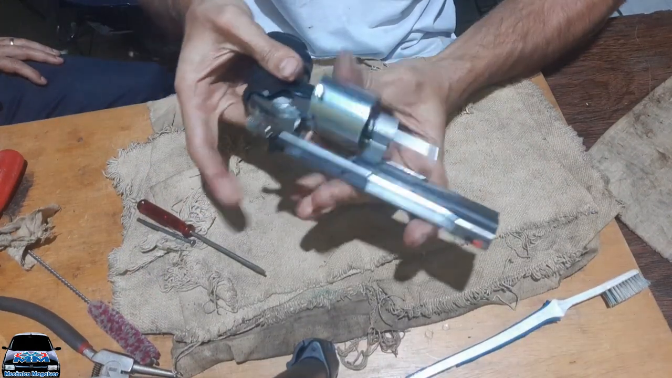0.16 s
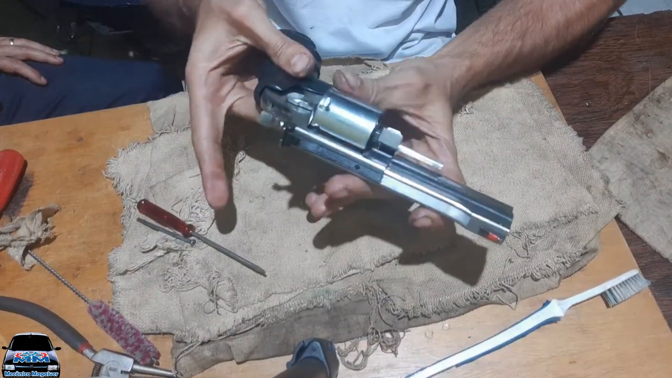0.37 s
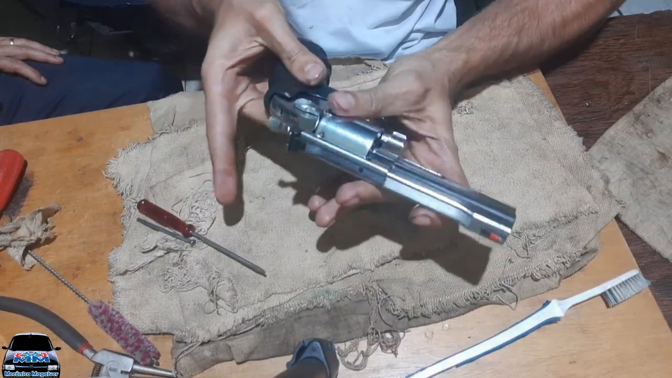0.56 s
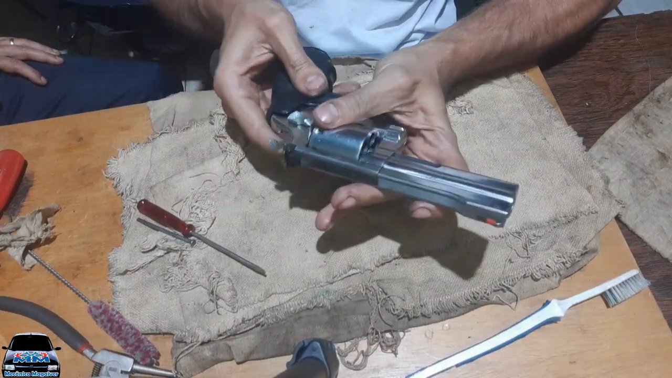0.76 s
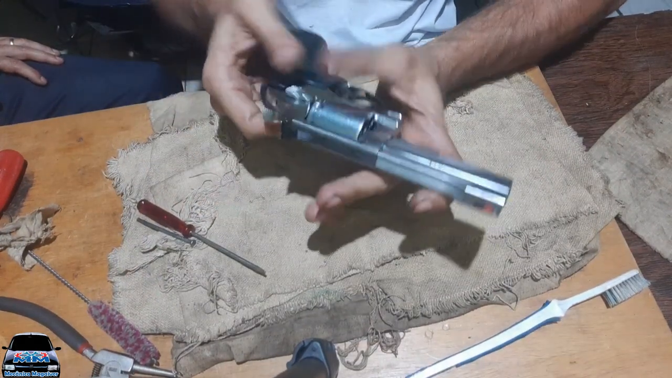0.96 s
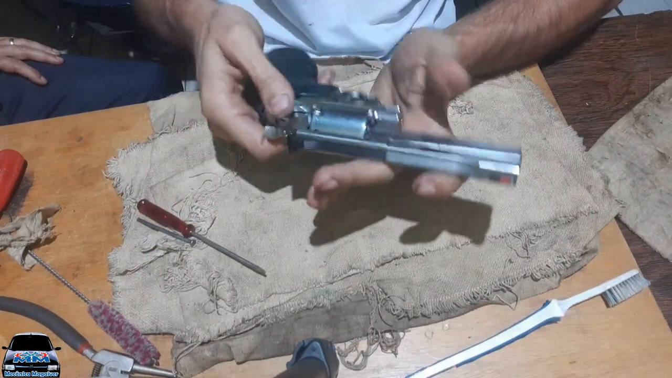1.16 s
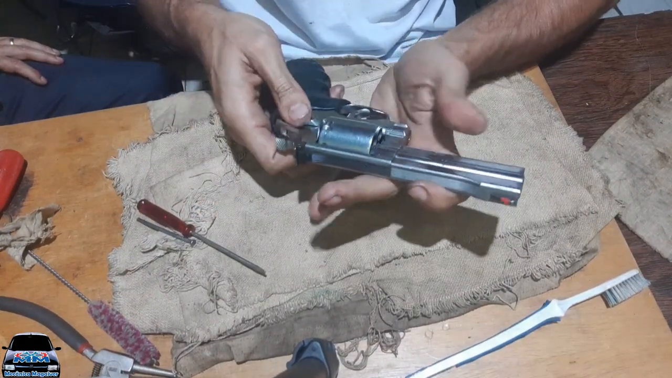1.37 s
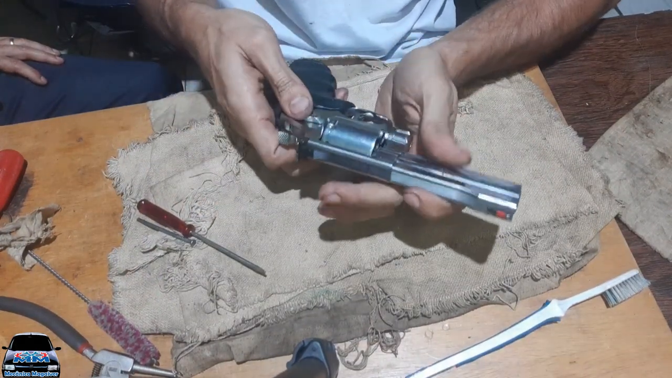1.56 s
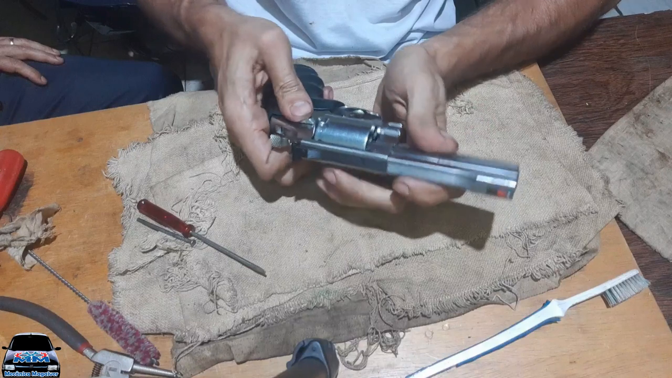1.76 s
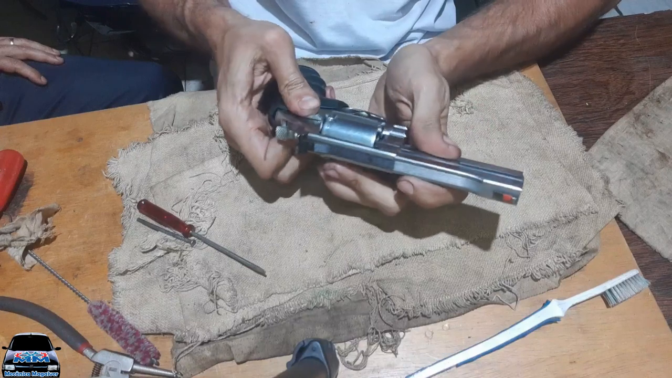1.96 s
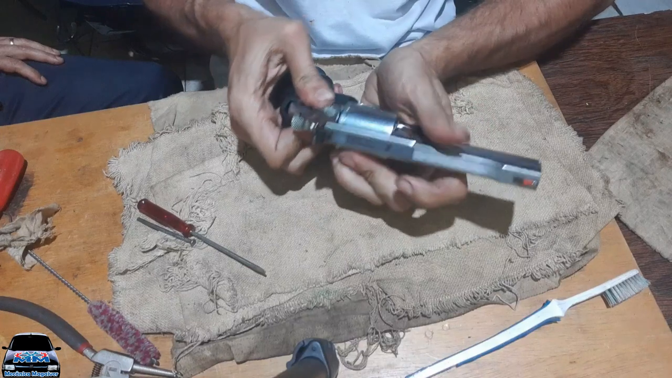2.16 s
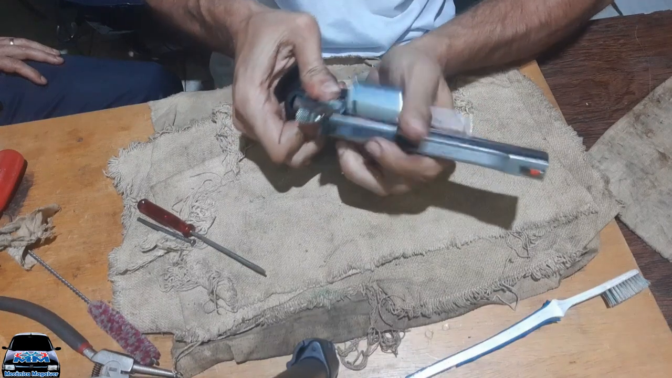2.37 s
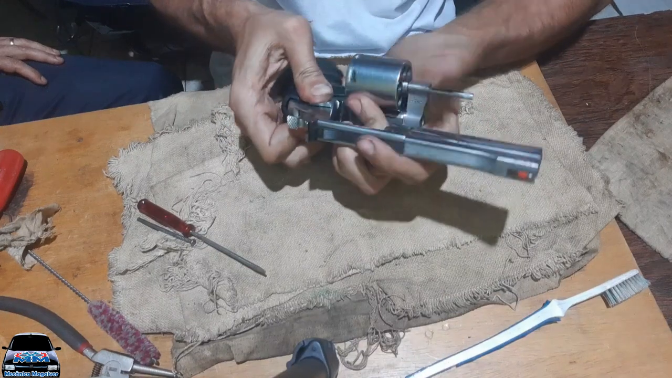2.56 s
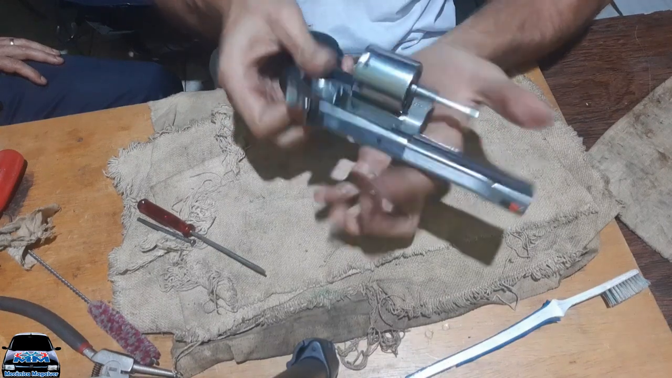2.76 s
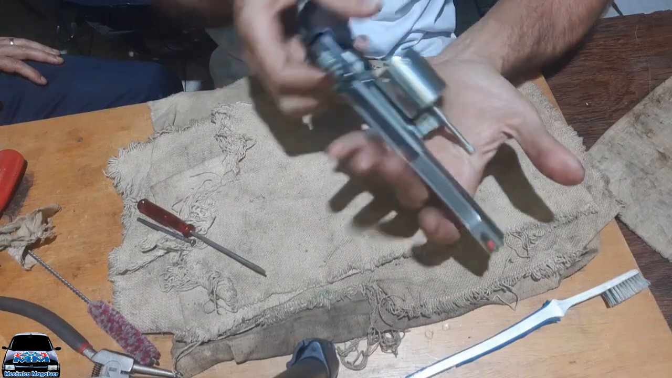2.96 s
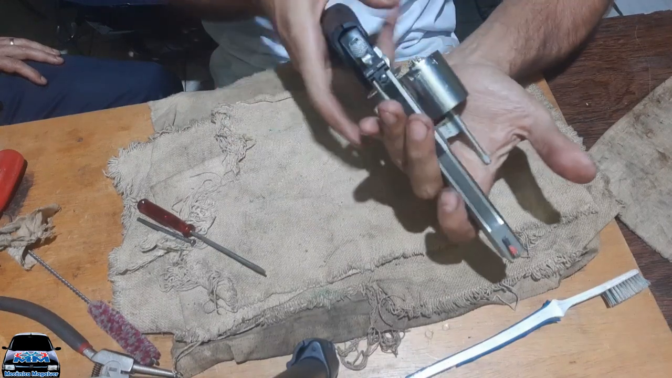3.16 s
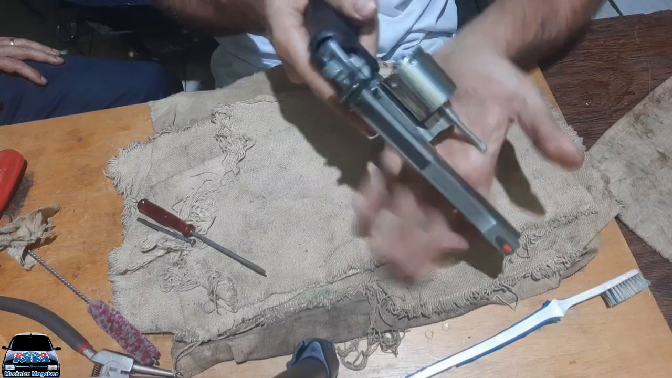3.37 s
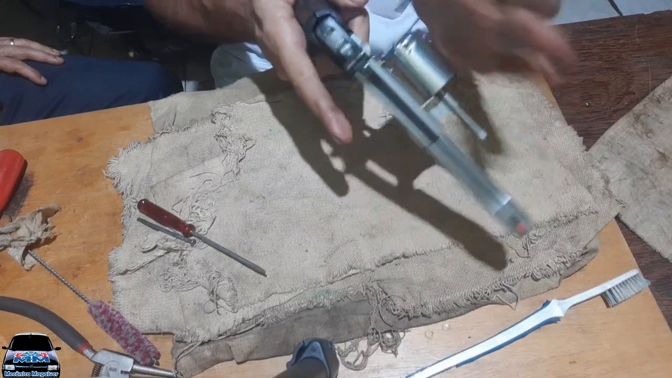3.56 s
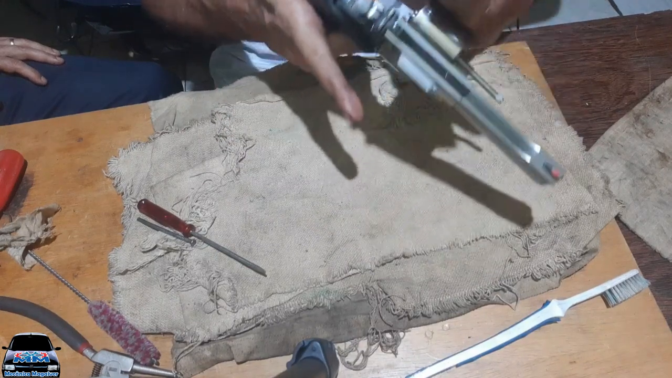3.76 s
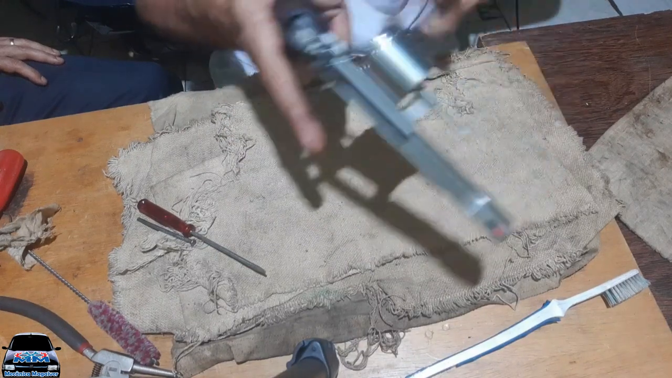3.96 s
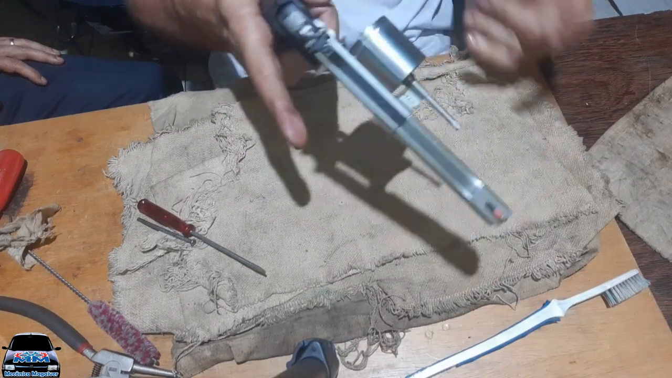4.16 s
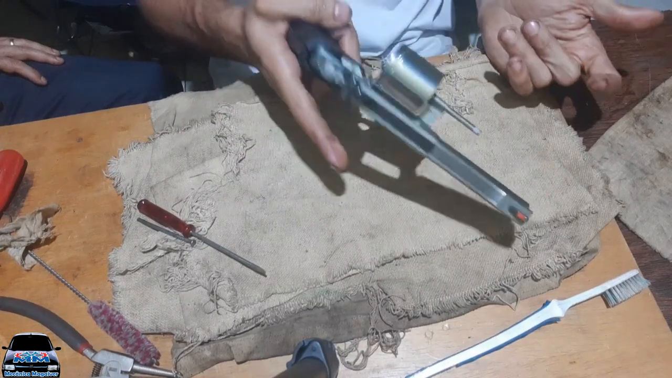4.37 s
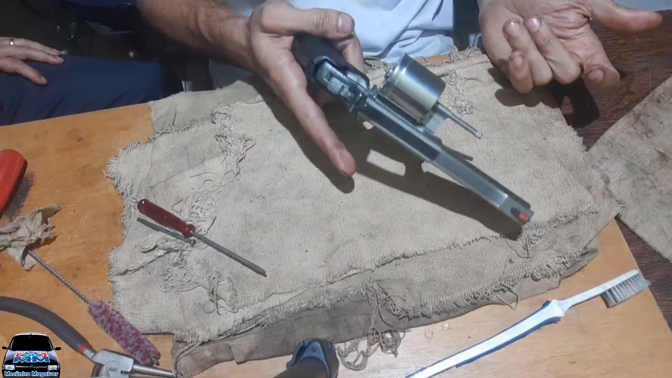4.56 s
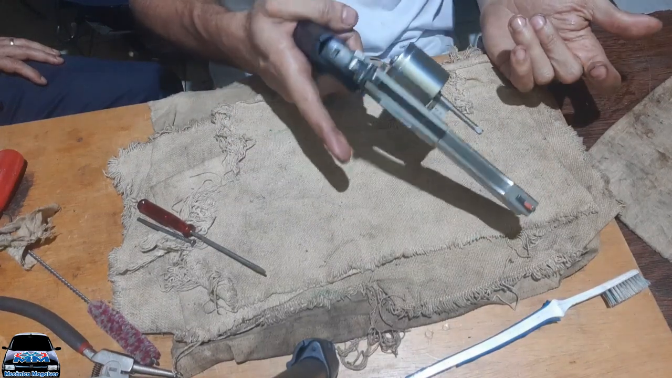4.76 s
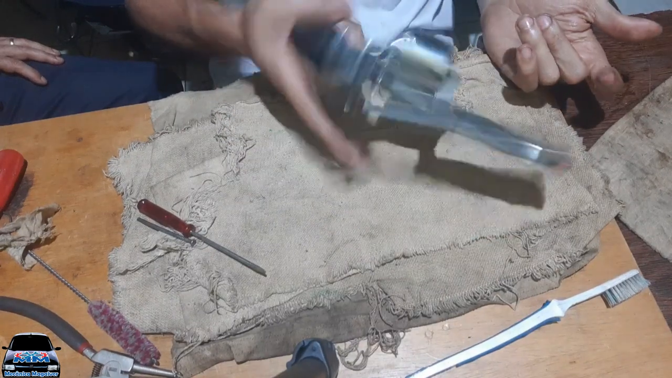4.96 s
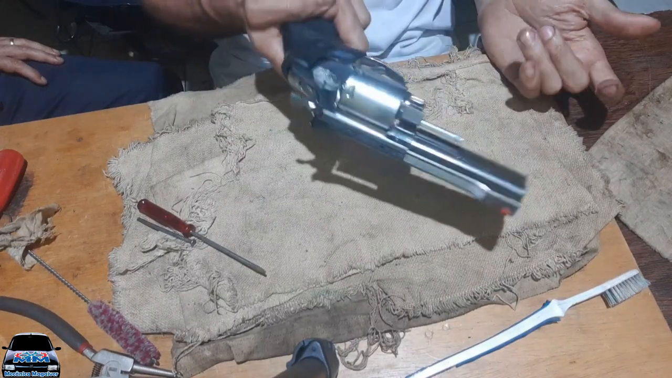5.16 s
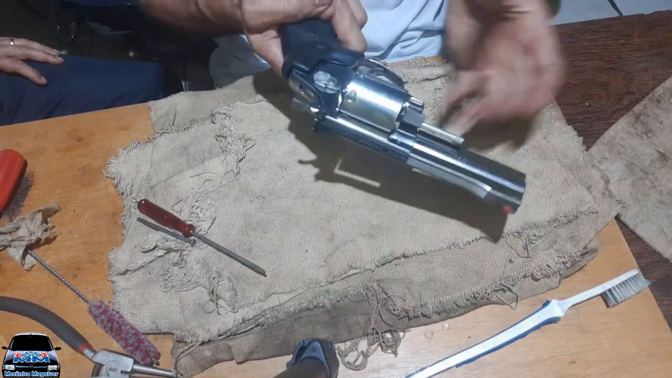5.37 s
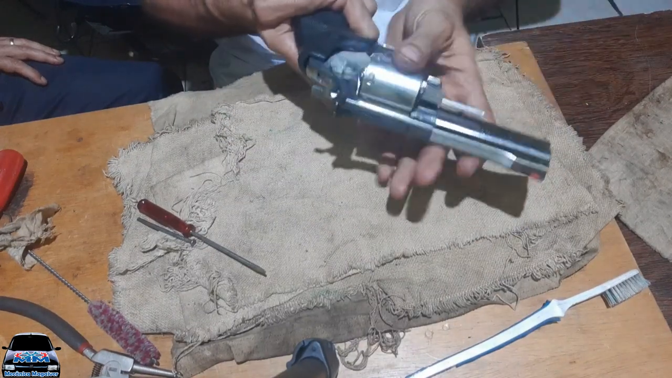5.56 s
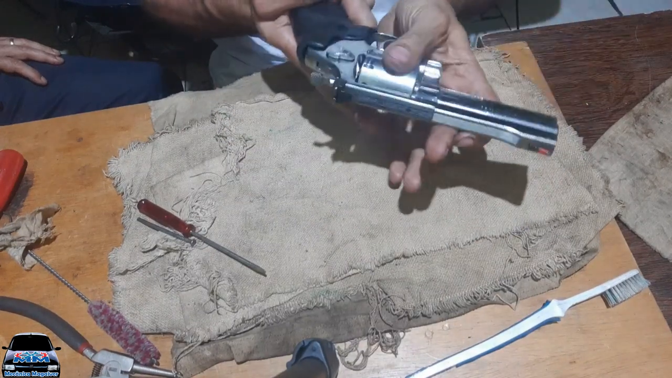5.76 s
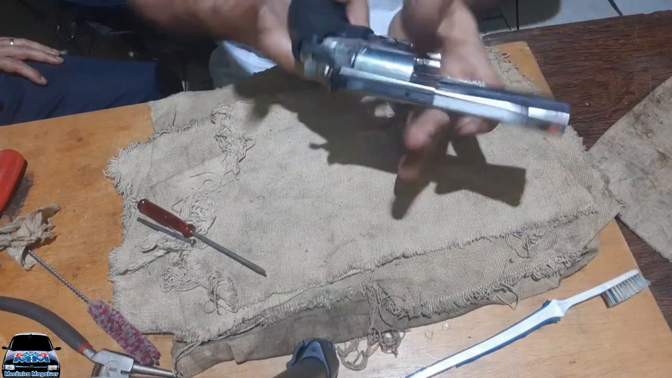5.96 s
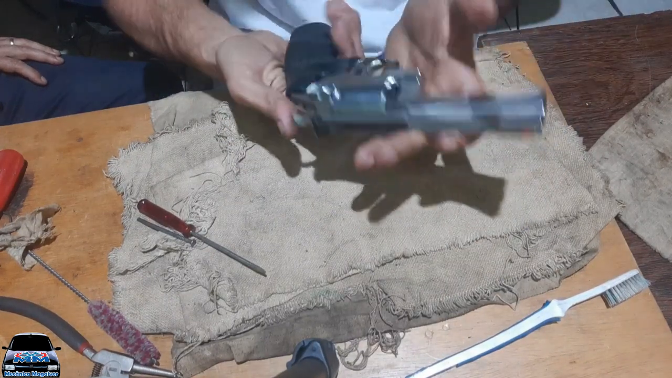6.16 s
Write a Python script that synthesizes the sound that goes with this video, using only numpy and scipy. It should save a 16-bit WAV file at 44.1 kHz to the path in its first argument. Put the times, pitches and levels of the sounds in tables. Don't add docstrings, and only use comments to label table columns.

```python
import sys
import numpy as np
from scipy import signal
from scipy.fft import rfft, irfft
from scipy.io import wavfile

SR = 44100
rng = np.random.default_rng(int(sys.argv[2]) if len(sys.argv) > 2 else 0)


def persist_wave(psi):
    counts = np.round(np.clip(psi, -1, 1) * 32767).astype(np.int16)
    wavfile.write(sys.argv[1], SR, np.atleast_2d(counts).T)


def ratio(d):
    e = np.asarray(d, float) / 20
    return 10 ** e


N = 274302


def at_hz(points, hz):
    points_hz, values = np.array(points).T
    return np.interp(np.log(hz), np.log(points_hz), values)


def rms_one(x):
    return x / np.sqrt(np.mean(x ** 2) + 1e-20)


def add(out, start_s, sound):
    i = round(start_s * SR)
    out[..., i:i + sound.shape[-1]] += sound[..., :N - i]


def ring(clicks, hz, t60_s):
    decay = ratio(-60 / (t60_s * SR))
    turn = 2 * np.pi * hz / SR
    return signal.lfilter([0, np.sin(turn)], [1, -2 * decay * np.cos(turn), decay ** 2], clicks + 1e-18)


def drift(rate_hz):
    decay = np.exp(-80 * np.pi * rate_hz / SR)
    coarse = rng.standard_normal(N // 40 + 2002)
    slow = signal.lfilter([1], [1, -2 * decay, decay ** 2], coarse)[2000:]
    return np.interp(np.arange(N) / 40, np.arange(len(slow)), rms_one(slow))


# (pitch_hz, likeness from -1 to 1)
PORT_LIKENESS = [(30, 0.79), (70, 1), (180, 0.71), (550, 0.43), (1650, -0.12), (4970, 0.07), (15000, -0.24)]


def bands(size):
    edges_hz = 22 * 2 ** np.arange(0, 9.6, .5)
    white = rng.standard_normal((2, 2, size))
    for k, (low, high) in enumerate(zip(edges_hz, edges_hz[1:])):
        band = signal.butter(2, [low, high], "band", fs=SR, output="sos")
        mid, side = signal.sosfilt(band, white[k % 2])
        hz = np.sqrt(low * high)
        alike = np.clip(at_hz(PORT_LIKENESS, hz), -1, 1)
        yield hz, np.sqrt(1 + alike) * mid + np.sqrt(1 - alike) * side * [[1], [-1]]


# (time_s, drone_db)
TRAFFIC_DRONE = [(0.0, -68), (0.29, -70), (0.78, -63), (1.39, -67), (1.8, -70), (1.97, -69.5),
                 (2.55, -69.5), (2.74, -65), (2.91, -62), (3.22, -70), (4.07, -71), (4.31, -65),
                 (4.57, -70), (4.81, -72), (5.78, -65), (6.22, -65)]
# (pitch_hz, level_db per Hz)
TRAFFIC_COLOUR = [(15, -46), (25, -8), (108, -4.5), (137, -14.5), (161, -15.5), (195, -17), (270, -23.5),
                  (309, -15.5), (427, -16.5), (516, -22.5), (659, -17.5), (1560, -25.5), (5140, -40.5),
                  (8830, -38), (16000, -56)]


def street(patchy_db=2.0):
    drone_db = np.interp(np.arange(N) / SR, *np.transpose(TRAFFIC_DRONE))
    swing_db = drone_db - drone_db.mean()
    rumble_db = -65.5 + 0.37 * swing_db
    hiss_db = -73.5 + 0.6 * swing_db
    layers = np.zeros((3, 2, N))
    for hz, noise in bands(N):
        layer = np.searchsorted([180, 1300], hz)
        layers[layer] += ratio(at_hz(TRAFFIC_COLOUR, hz) + patchy_db * drift(17)) * noise
    return sum(ratio(db) * rms_one(x) for db, x in zip((rumble_db, drone_db, hiss_db), layers))


# (start_s, end_s, pitch_hz, width_hz, level_db)
FAR_NOTES = [
    (0.214, 1.484, 101, 9.9, -65.5),
    (0.643, 1.003, 596, 5.5, -73),
    (1.293, 1.83, 1209, 65, -72.5),
    (1.594, 2.077, 465, 68, -70.5),
    (2.476, 3.104, 589, 87, -74),
    (5.5, 5.888, 476, 71, -71.5),
]


def far_notes():
    out, t = 0, np.arange(N) / SR
    for start_s, end_s, hz, width_hz, level_db in FAR_NOTES:
        t60_s = np.log(1000) / (1.55 * np.pi * width_hz)
        tone = ring(ring(rng.standard_normal(N), hz, t60_s), hz, t60_s)
        fade = np.clip(np.minimum(t - start_s, end_s - t) / .04, 0, 1)
        out = out + ratio(level_db) * rms_one(tone) * fade
    return out


# (start_s, part struck, level_db per Hz, chatter_ms, extra weight_db near 1.3 kHz, extra edge_db near 11 kHz)
SNAPS = [(.3755, "crane", 15, 3.1, 2.5, 0.8), (.6486, "catch", 8.5, 1.7, -11.8, -2),
         (.8662, "ratchet", -2, 3, -17, 6.5), (.8676, "ratchet", 0, 2.1, 2.5, -9),
         (2.5573, "latch", 0.5, 0.78, -6, -7.5), (2.7152, "stop", -0.5, 0.86, -12, 0),
         (4.0892, "latch", -4.5, 1.6, -6.5, 1.5), (5.1802, "latch", -1.5, 1.2, -4.5, 0.5),
         (5.2172, "lock", 10.5, 0.77, 1.5, 4), (5.2207, "lock", 7, 1.1, -35.5, 0),
         (5.8047, "drum", 4, 3.1, .2, 4.5), (5.8287, "drum", 7.5, 1.8, -3.8, -0.8)]
# (start_s, part struck,
# level_db per Hz)
LIGHT_TOUCHES = [(0.638, "lock", -19), (1.223, "lock", -39), (1.903, "ratchet", -28),
                 (2.509, "slide", -32.5), (2.52, "slide", -32), (2.5324, "slide", -29),
                 (2.5378, "slide", -18), (2.546, "slide", -17.5), (2.6878, "latch", -18),
                 (3.553, "lock", -33), (3.739, "lock", -40), (4.047, "slide", -38.5), (4.079, "lock", -36),
                 (4.1186, "ratchet", -19), (4.141, "slide", -34), (5.2157, "ratchet", -35),
                 (5.240, "slide", -11), (5.8233, "slide", -15), (5.8367, "stop", -2.5), (6.06, "lock", -40),
                 (6.121, "lock", -39)]
TOUCH_SOUND = {"stop": (1.5, -16, 3), "lock": (5.0, 4.9, 1.6), "latch": (1.7, -9, -2.5),
               "ratchet": (1.1, 1, -13.5), "slide": (2.3, -4, 0.39)}
# (pitch_hz, t60_s)
FRAME_MODES = [(1050, .012), (1300, .01), (1520, .022), (1910, .014), (2180, .008), (2420, .015),
               (2700, .008), (3150, .009), (3500, .007), (3800, .007), (4120, .026), (4350, .013),
               (4750, .006), (5250, .007), (5720, .015), (6100, .006), (6500, .006), (7150, .01),
               (7600, .006), (8200, .005), (8700, .005), (9200, .005), (9800, .004), (10300, .005),
               (10900, .004), (11700, .003), (12500, .003), (13400, .003), (14500, .0025)]
PART_SHAKES = {"lock": [(1060, -5), (1480, 3.5), (2550, -1.5), (3280, 2.5), (4130, 5), (4940, 4.5),
               (5780, -1), (7050, -2), (8700, -7.5), (10500, -10), (13400, -32.5)], "latch": [(1060, -4.5),
               (1480, -1.5), (2550, -7), (3280, -2), (4130, 1), (4940, -3.5), (5780, -6), (7050, -6.5),
               (8700, -7.5), (10500, -37), (13400, -45.5)], "ratchet": [(1060, -6.5), (1480, -4),
               (1980, -9.5), (3280, -2), (4130, 1), (4940, -5), (5780, 4.5), (7050, -6), (8700, 1.5),
               (10500, -5), (13400, -20)], "stop": [(1060, -27.5), (1480, -5), (1980, -9.5), (2550, -21),
               (4130, -13.5), (4940, -4.5), (5780, -0.5), (7050, -6.5), (8700, -10), (10500, -25.5),
               (13400, -38.5)], "slide": [(1060, -4), (1980, -1), (2550, -14), (3280, 14), (4130, -25),
               (5780, 4.5), (8700, 5.5), (10500, -4), (13400, -14.5)]}
ARM_SHAKES = {"drum": [(590, -40), (1000, -5), (1470, -3), (1950, -6), (3110, -4), (4720, -5.5),
              (5860, 0.5), (9750, -5), (15000, -27.5)], "crane": [(590, -52), (1000, -22.5), (1500, -5.5),
              (1780, -5.5), (3560, -4), (4220, 0), (5000, -6), (7950, -9.5), (15000, -35.5)],
              "catch": [(590, -41), (1000, 2), (1950, -11.5), (2340, 0.5), (3110, -16.5), (4260, 1.5),
              (5110, -11.5), (5860, 0), (15000, -23)]}
FACING_DB = {"lock": 2.1, "latch": 1.5, "ratchet": 3, "stop": 5.5, "slide": -1, "drum": 1.7, "crane": 1,
             "catch": 3.5}


def snaps():
    aside_db = 2.28
    apart = 1.0
    chatter = 0.051
    crack, crack_short = 0.19, 3.5
    out, t = np.zeros((4, N)), np.arange(1600) / SR
    shakes = PART_SHAKES | ARM_SHAKES
    share = np.sqrt(np.gradient(np.array(FRAME_MODES)[:, 0]) / (SR / 2))
    touches = [(*row, *TOUCH_SOUND[row[1]]) for row in LIGHT_TOUCHES]
    for n, (start_s, part, level_db, chatter_ms, weight_db, edge_db) in enumerate([*SNAPS, *touches]):
        luck = rng.standard_normal((3, len(FRAME_MODES)))
        both, *own = rng.standard_normal((3, len(t)))
        hits = both + apart * np.array(own)
        hits = hits * np.abs(hits) * chatter * np.exp(-t * 1000 / chatter_ms) * (t < .03)
        hits = np.vstack([hits, 0 * t])
        hits[:, 0] = 1
        lean = [(1300, weight_db), (3500, 0), (6000, 0), (11000, edge_db)]
        for k, (hz, t60_s) in enumerate(FRAME_MODES):
            brief = crack * crack_short * ring(hits, hz, t60_s / crack_short)
            rings = ring(hits, hz, t60_s) + np.c_[[1, 1, 0]] * brief
            gain = (-1) ** k * share[k] * ratio(level_db + at_hz(shakes[part], hz) + at_hz(lean, hz))
            facing_db = (FACING_DB[part] + aside_db * luck[:, k]) * [1, 1, 0]
            gain = gain * ratio(facing_db) / np.linalg.norm(rings, axis=1)
            add(out[:2], start_s, gain[:2, None] * rings[:2])
            add(out[2 + n % 2], start_s, gain[2] * rings[2])
    return signal.sosfilt(signal.butter(3, 800, "high", fs=SR, output="sos"), out)


def thuds(table, cycles):
    out, t = np.zeros(N), np.arange(8000) / SR
    for start_s, peak_db, hz, t60_s in table:
        swell = (1 - np.exp(-(t * hz / cycles) ** 2)) * ratio(-60 * t / max(t60_s, .01))
        add(out, start_s, ratio(peak_db) * swell / swell.max() * np.sin(2 * np.pi * hz * t))
    return out


# (start_s, peak_db, pitch_hz, t60_s)
KNOCKS = [(.377, -34.5, 717, 0.0087), (.652, -43, 496, 0.037), (.869, -48, 740, 0.033),
          (.870, -58.5, 480.6, 0.14), (2.559, -51.5, 490, 0.018), (2.7175, -46, 492, 0.03),
          (5.218, -37, 820, 0.007), (5.2185, -51.5, 293, 0.023), (5.2176, -26, 4105, .05),
          (2.5575, -46, 4050, .03), (5.830, -46, 683, 0.036)]


def knocks():
    return thuds(KNOCKS, cycles=1.0) * [[1], [1], [.7], [.3]]


def ports(x):
    bench_s, bench_db = 0.0013, -19.5
    wall_s, wall_db = 0.018, -45
    left_lead_s, left_db = .0001, 1.2
    turn = -2j * np.pi * np.fft.rfftfreq(N, 1 / SR)
    echo = 1 + ratio(bench_db) * np.exp(turn * bench_s) + ratio(wall_db) * np.exp(turn * wall_s)
    lag = np.exp(turn * left_lead_s * np.array([[0], [1]])) * ratio(left_db * np.array([[1], [-1]]))
    return irfft(rfft(x) * echo * lag, N)


# (pitch_hz, t60_s)
ROOM_T60 = [(300, 0.48), (1500, 0.54), (2800, 0.88), (4200, 0.51), (8000, 0.62), (15000, 0.23)]
# (pitch_hz, level_db)
ROOM_COLOUR = [(300, -5.5), (1500, -0.5), (4000, -6), (8000, -5.5), (15000, 9.5)]


def room(x):
    out, t = 0, np.arange(SR * 3 // 4) / SR
    for spot in x:
        tail = 0
        for hz, noise in bands(len(t)):
            tail = tail + ratio(at_hz(ROOM_COLOUR, hz) - 60 * t / at_hz(ROOM_T60, hz)) * noise
        tail = tail * (1 - np.exp(-(t / 0.0035) ** 2))
        tail = tail / np.sqrt(np.sum(tail ** 2) / 2)
        out = out + signal.fftconvolve(spot[None], tail, axes=1)[:, :N]
    return ratio(-7.5) * out


# (peak_s, peak_db, rise_db per s, fall_db per s)
RUBS = [
    (1.222, -64.5, 388, 195),
    (2.229, -76, 604, 102.5),
    (3.557, -63, 900, 142),
    (3.59, -61.5, 203, 247),
    (3.74, -74.5, 605, 79),
    (4.128, -63.5, 924, 202),
    (4.445, -72, 65, 140),
    (5.55, -69, 900, 103.5),
]
# (pitch_hz, level_db per Hz)
RUB_COLOUR = [(180, -60), (300, 1.5), (459, -11), (515, -3), (801, -6.5), (1210, -6.5), (4250, -12),
              (15000, -31.5)]


def rubs(grain_db=3.0):
    level, t = 0, np.arange(N) / SR
    for peak_s, peak_db, rise, fall in RUBS:
        level = level + ratio(peak_db - np.maximum(rise * (peak_s - t), fall * (t - peak_s)))
    noise = rms_one(sum(ratio(at_hz(RUB_COLOUR, hz)) * b for hz, b in bands(N)))
    return ratio(2.0 + grain_db * drift(142)) * level * noise


# (start_s, peak_db, pitch_hz, t60_s)
BUMPS = [
    (3.555, -52, 126, 0.21),
    (3.596, -52.5, 78, 0.23),
    (3.608, -49.5, 135, 0.12),
    (4.386, -46, 192, 0.018),
    (4.395, -40, 97, 0.066),
    (4.42, -39.5, 91, 0.033),
    (4.434, -43, 105, 0.087),
]


def bumps():
    return thuds(BUMPS, cycles=0.16)


def scene():
    gun = snaps() + knocks()
    return street() + far_notes() + ports(gun[:2]) + room(gun[2:]) + rubs() + bumps()


def low_pass(x):
    return signal.sosfilt(signal.butter(12, 16530, fs=SR, output="sos"), x)


def record(dry):
    return low_pass(dry)


dry = scene()
out = record(dry)
persist_wave(out)
```